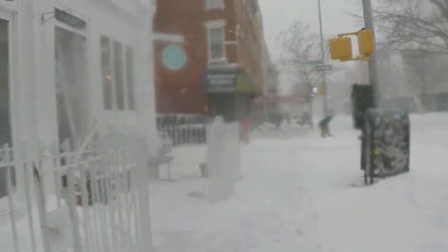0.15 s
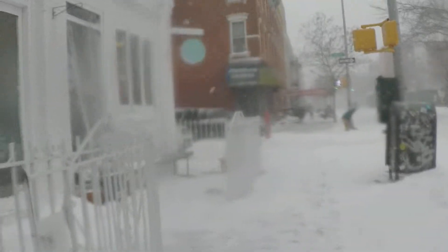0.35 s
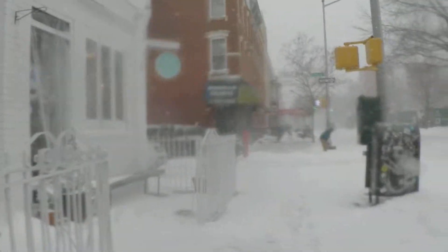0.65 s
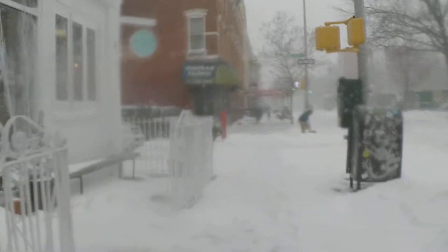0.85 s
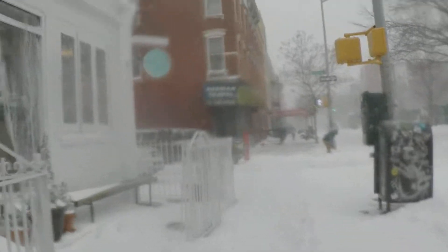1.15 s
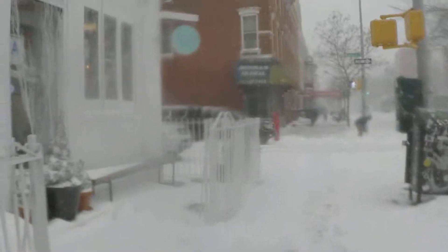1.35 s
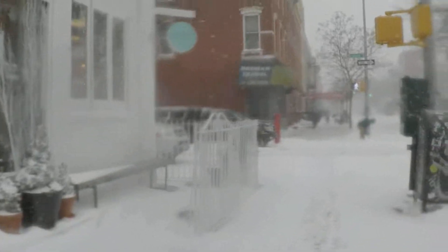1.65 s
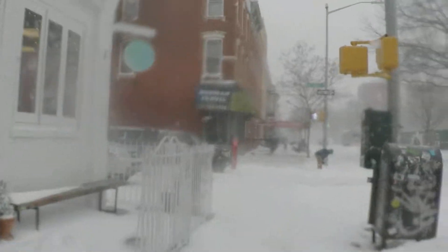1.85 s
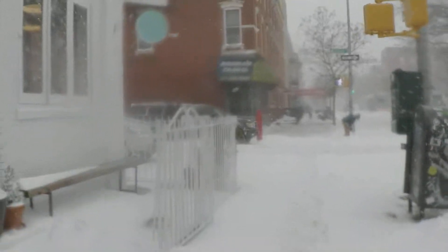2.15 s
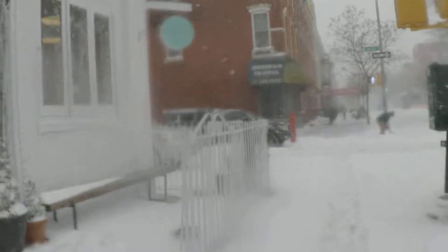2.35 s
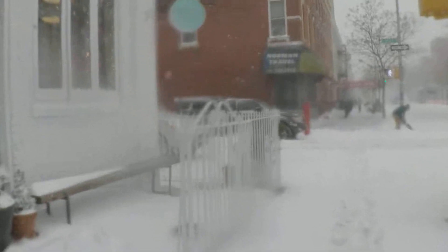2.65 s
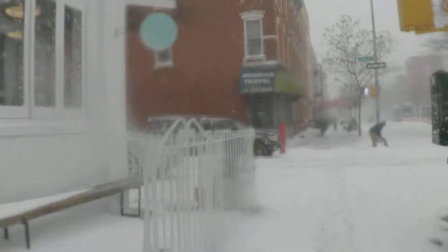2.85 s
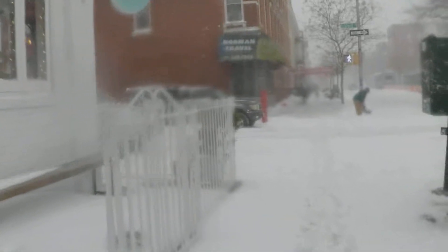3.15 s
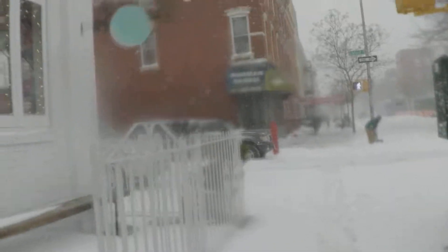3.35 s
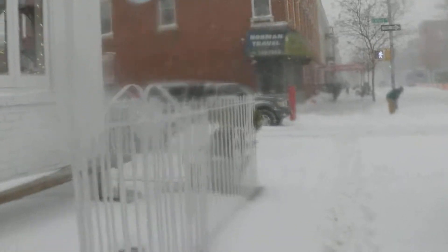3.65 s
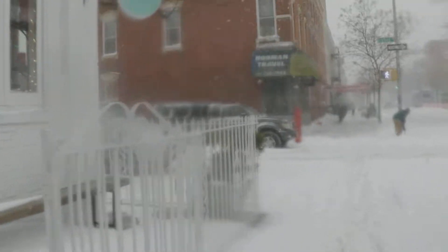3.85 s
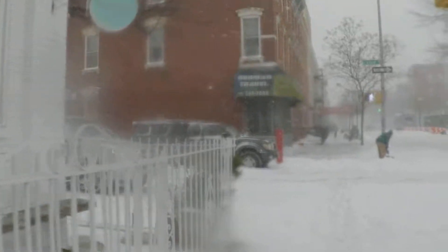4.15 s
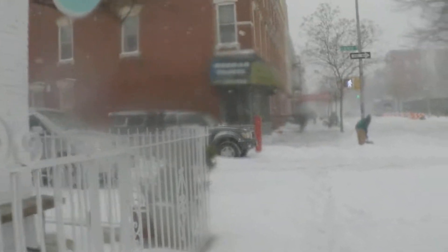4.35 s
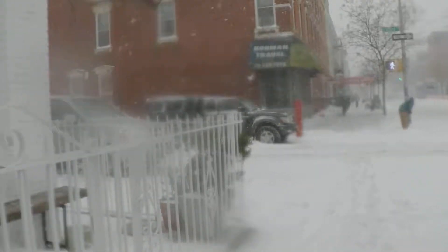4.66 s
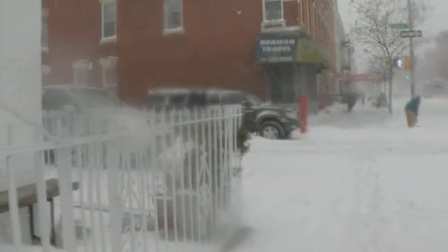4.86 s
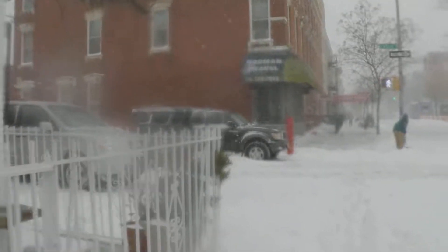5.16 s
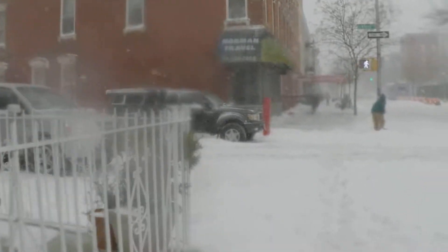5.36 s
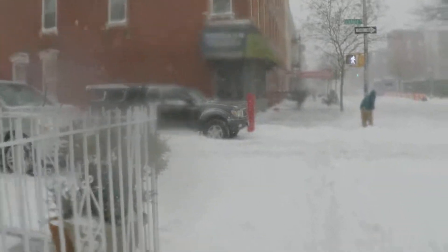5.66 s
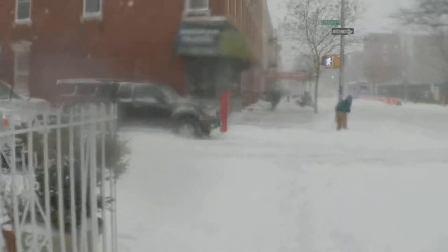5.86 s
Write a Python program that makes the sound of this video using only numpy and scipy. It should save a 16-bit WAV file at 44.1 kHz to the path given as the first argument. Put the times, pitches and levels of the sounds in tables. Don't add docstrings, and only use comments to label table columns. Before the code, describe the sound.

Outdoors in a snowstorm, strong wind strikes a small handheld stereo microphone. A deep, uneven rumble dominates the right, while the sheltered left gets duller thuds and fluttering bursts. Faint snow hiss and tiny ice ticks sit close on top. Boots crunch softly early on, then most clearly just before four seconds, where a hollow howl rises, and again near five.

```python
import sys
import numpy as np
from scipy import signal
from scipy.fft import rfft, irfft
from scipy.io import wavfile
from scipy.ndimage import uniform_filter1d

SR = 44100
rng = np.random.default_rng(int(sys.argv[2]) if len(sys.argv) > 2 else 0)


def voltage_ratio(level):
    return 10 ** (np.asarray(level, float) / 20)


def put_to_file(sound):
    columns = np.atleast_2d(sound).T
    safe = np.clip(columns, -1, 1)
    whole_steps = np.round(safe * 32767)
    wavfile.write(sys.argv[1], SR, whole_steps.astype(np.int16))


N = 264644
TIME = np.arange(N) / SR
FREQ = np.arange(N // 2 + 1) * SR / N + 1e-9

# time [s], gust force [dB], fineness of the eddies [dB].
WIND = [(0.0, -16, 2), (0.3, -12, -3), (0.75, -10.5, -0.5), (0.95, -14, -1.5), (1.15, -9.5, -3),
        (1.6, -14.5, 0), (1.95, -14, -4), (2.2, -12.5, -1.5), (2.75, -10, -0.5), (3.15, -13, -0.5),
        (3.55, -14, 5.5), (4.05, -12, 3.5), (4.3, -11, -2), (4.75, -14, 4), (5.05, -13, 5.5), (5.5, -11, 2),
        (5.9, -9.5, -3.5), (6.0, -13.5, 0)]
# frequency [Hz], density [dB per Hz].
WINDWARD_COLOUR = [(12, -22.5), (25, -0.5), (45, 0.5), (100, -7), (220, -16.5), (480, -16.5), (620, -19.5),
                   (800, -30), (1200, -43), (2200, -64.5), (4500, -74), (9000, -76)]
ROAR_HZ, RUSH_HZ = 100, 330
ROAR_DB, RUSH_DB = -7, -12.5
ROAR_FOLLOW, BUFFET_YIELD = 0.24, 0.067
# time [s], half length [s], boost [dB].
POUNDS = [(0.35, 0.037, 2), (0.49, 0.043, 1.5), (0.81, 0.066, 2), (1.67, 0.014, 6.5), (1.8, 0.076, 4),
          (2.09, .06, 0), (2.53, 0.039, 2.5), (2.93, 0.073, 2), (3.24, .04, 3.5), (3.76, 0.11, 2.5),
          (3.93, 0.04, -10), (4.3, 0.021, 4), (4.79, 0.033, -6.5), (5.07, .04, -7.5), (5.12, 0.065, 4),
          (5.51, .05, -5), (5.61, .05, -1), (5.93, 0.027, 3.5)]
# time [s], half length [s], boost [dB].
ROLLS = [(0.0, 0.055, 0), (0.09, 0.052, -2.5), (0.49, 0.01, 6.5), (1.31, 0.03, 8), (1.55, 0.1, 8),
         (1.86, 0.016, -5), (1.97, 0.014, -10), (2.72, 0.056, 3), (3.68, 0.022, 3), (3.93, 0.11, 7),
         (4.15, 0.022, 12.5), (5.4, 0.032, 3.5), (5.51, 0.058, -5), (5.68, 0.078, 4.5), (5.85, .05, 2),
         (1.8, 0.04, 2.5), (5.96, 0.062, 8)]
# time [s], half length [s], boost [dB].
SLAPS = [
    (1.304, 0.021, 8.5),
    (4.148, 0.03, -0.5),
    (4.812, 0.011, 9),
    (1.673, .025, 6.5),
    (3.784, .03, 4.5),
    (4.927, 0.023, 4),
]
# time [s], attack [s], hold [s], release [s], level [dB].
HOWLS = [
    (3.787, .1, 0.14, .05, -21),
    (3.905, .2, 0.034, 0.45, -17),
    (4.93, 0.055, .001, 0.031, -13.5),
]
# frequency [Hz], width [Hz], level [dB].
HOWL_MODE = [
    (460.5, 80, 0),
]
HOWL_DEPTH_DB = 15

# time [s], attack [s], hold [s], release [s], strength [dB].
EDDIES = [(0.68, .1, 0, .11, -22), (1.08, .04, 0, .09, -34), (1.3, .13, 0, .05, -33),
          (1.48, .14, 0, .09, -16.5), (1.53, .1, .035, .09, -16.5), (1.672, .07, .01, .13, -16),
          (2.38, .13, 0, .25, -17), (2.46, .1, .14, .1, -22), (2.71, .12, .12, .1, -22.5),
          (2.9, .2, 0, .2, -20), (3.1, .2, .03, .19, -32.5), (3.54, .2, 0, .2, -40),
          (4.05, .06, 0, .16, -31), (4.34, .2, 0, .3, -22), (4.25, .07, .2, .05, -29),
          (5.18, .11, 0, .12, -31), (5.39, .13, 0, .17, -17), (5.89, .3, 0, .12, -35)]
# frequency [Hz], density [dB per Hz].
LEE_COLOUR = [(15, -12), (45, -8), (130, 0), (250, -3), (450, -8), (700, -19), (1000, -30), (2000, -51),
              (5000, -75)]
FLUTTER_HZ, TEAR_HZ = 200, 500
CALM_DB, THUD_CALM_DB, THUD_SLOPE = -51, -36, .52
TEAR_CALM_DB, TEAR_TOP_DB, TEAR_SLOPE = -50, -23, 2.0

# frequency [Hz], share [1].
LEAK = [(40, .58), (100, .52), (220, .35), (300, .16), (370, 0), (470, -.2), (600, -.33), (800, -.52),
        (1100, -.5), (2000, -.1)]
LEAK_TURN = .27
LEE_NULL_SHIFT = 1.45

# time [s], density [dB].
DRIFT = [(0.0, -60.5), (0.42, -55), (0.65, -52.5), (0.85, -58), (1.49, -59.5), (1.82, -58.5), (2.31, -60.5),
         (2.47, -56), (3.26, -58.5), (3.64, -55.5), (3.93, -50.5), (4.08, -56), (4.44, -58.5), (4.66, -62),
         (4.83, -62), (5.23, -52.5), (5.6, -60.5), (6.0, -61.5)]
# time [s], half length [s], boost [dB].
FLURRIES = [(0.32, 0.038, 5.5), (0.64, 0.012, 7), (0.72, 0.044, 7), (1.18, 0.098, 7.5), (1.34, 0.029, -7),
            (1.81, 0.025, 5), (1.92, 0.012, 8), (2.04, 0.077, 4), (2.32, 0.051, 6), (2.65, 0.026, 2),
            (2.72, 0.063, -6), (2.82, 0.098, 5), (3.83, 0.06, -13), (3.95, .05, -2), (4.33, 0.054, 2),
            (4.79, 0.11, 5), (5.14, 0.052, 4.5), (5.53, 0.044, 7), (5.84, 0.046, 5.5)]
# frequency [Hz], density [dB per Hz].
SNOW_COLOUR = [(900, 3.5), (1300, 4), (2100, -1.5), (3700, -7.5), (5000, -12.5), (6000, -8), (7300, -3),
               (8300, -7), (9800, -8.5), (11300, -17), (12500, -22.5), (13300, -49), (14800, -64)]

# time [s], peak [dB], left minus right [dB], ring [Hz].
GRAINS = [(0.226, -34, -9, 8000), (0.2756, -31, -5, 7380), (0.6473, -35, -10, 6460), (0.6968, -33, 6, 7330),
          (0.7554, -21, -4, 6000), (0.901, -33, -6, 9070), (1.0623, -32.5, -9, 9000),
          (1.1818, -21, -1, 7560), (1.1912, -27, -11, 7650), (1.5783, -22, -1, 7360),
          (1.7977, -34, -20, 9320), (1.843, -36, -17, 7100), (1.9854, -25.5, -3.5, 6560),
          (2.012, -33, -7, 9160), (2.0423, -31, 3, 7800), (2.1944, -34, -4.5, 6600), (2.819, -41, 10, 7440),
          (2.8335, -25.5, -5, 6860), (3.235, -20.5, -15, 7070), (3.3468, -34, -17, 8940),
          (3.532, -22.5, -5, 8330), (3.8207, -28, -3, 7000), (3.9937, -30, -18, 7530),
          (4.045, -26, 0, 7360), (4.334, -34.5, -7, 7500), (4.595, -34, -2.5, 6730), (5.049, -28, -4, 7250),
          (5.188, -33, 12, 7140), (5.2794, -22, 3, 7400), (5.3587, -38, 4, 7600)]
GRAIN_T60_S = 0.007
GRAIN_FLOOR_HZ = 5800
# time [s], peak [dB], ring [Hz].
KNOCKS = [
    (0.3656, -32, 1430),
    (0.8722, -21.5, 1520),
    (1.6252, -33, 1410),
    (3.2365, -33, 1600),
]
HOUSING_TOP_HZ = 11900

# time [s], attack [s], hold [s], release [s], crunch [dB].
STEPS = [
    (1.221, .11, .001, 0.029, -44.5),
    (2.388, .07, 0.27, 0.068, -48.5),
    (2.728, .05, .001, 0.054, -47),
    (3.728, 0.049, 0.055, 0.045, -59),
    (3.82, 0.1, .001, 0.085, -40.5),
    (3.927, 0.19, 0.097, 0.21, -41.5),
    (4.702, .008, .001, 0.076, -44.5),
    (4.81, 0.069, .001, 0.13, -41.5),
    (4.9, .1, 0.21, .01, -52.5),
]
STEP_DEPTH_DB, BRIGHT_DB, BRIGHT_SLOPE = 23, -16.5, 1.93
# frequency [Hz], width [Hz], level [dB].
CRUST = [
    (1340, 370, -3.5),
    (1790, 224, -3),
]
# frequency [Hz], width [Hz], level [dB].
CRUST_BRIGHT = [
    (2870, 460, 9),
    (3900, 170, 4),
    (5500, 560, 6),
    (6800, 730, -4),
]
# time [s], peak [dB], bright part [dB], decay by 60 dB [s].
CRACKS = [(1.179, -43, -18, 0.045), (1.2035, -45, -19, 0.043), (2.5154, -32, -20, 0.081),
          (2.634, -30, -43, 0.091), (2.7347, -39, -22, 0.058), (3.692, -38, -28, 0.11),
          (3.78, -31, -6, 0.045), (3.8213, -26, 9, 0.036), (3.994, -54, -2, 0.03),
          (4.7007, -50, -18, 0.044), (4.7905, -34, -19, 0.032), (4.8083, -35, -18, 0.062)]


def unit(x):
    return x / np.sqrt(np.mean(x ** 2))


def curves(table):
    s, *columns = np.transpose(table)
    return [np.interp(TIME, s, c) for c in columns]


def bumps(table, power=2):
    return sum(db * np.exp(-((TIME - s) / half) ** power) for s, half, db in table)


def swell(s, attack, hold, release):
    corners = np.cumsum([s - attack, attack, hold + 1e-4, release])
    return np.interp(TIME, corners, [0, 1, 1, 0])


def swell_db(row, depth_db):
    up = swell(*row[:4])
    return np.where(up > 0, row[4] - depth_db * (1 - up), -120)


def shape(x, response):
    return irfft(rfft(x) * response, N)


def colour(points):
    hz, db = np.transpose(points)
    return voltage_ratio(np.interp(np.log(FREQ), np.log(hz), db))


def modes(table):
    return sum(voltage_ratio(db) / (1 + 1j * (FREQ - hz ** 2 / FREQ) / width) for hz, width, db in table)


def under(hz):
    return 1 / np.sqrt(1 + (FREQ / hz) ** 8)


def over(gain):
    return np.sqrt(1 - gain ** 2)


def turbulence(response, even, span_s):
    x = unit(shape(rng.standard_normal(N), response))
    span = int(span_s * SR)
    swing = uniform_filter1d(uniform_filter1d(x ** 2, span), span)
    evened = x / (swing + 0.019) ** (even / 2)
    trim = np.sqrt(response / (response + 0.0013 * response.max()))
    return unit(shape(evened, trim))


def windward():
    gust_db, fine_db = curves(WIND)
    slap_db = bumps(SLAPS, power=4)
    buffet_db = gust_db - BUFFET_YIELD * fine_db + bumps(POUNDS)
    roar_db = gust_db + ROAR_DB + ROAR_FOLLOW * fine_db + bumps(ROLLS) + 0.61 * slap_db
    rush_db = gust_db + RUSH_DB + fine_db + slap_db
    howl_db = np.max([swell_db(row, HOWL_DEPTH_DB) for row in HOWLS], axis=0)
    air, low, mid = colour(WINDWARD_COLOUR), under(ROAR_HZ), under(RUSH_HZ)
    buffet = turbulence(air * low, even=.55, span_s=.045)
    roar = turbulence(air * over(low) * mid, even=0.21, span_s=0.02)
    rush = turbulence(air * over(mid), even=0.034, span_s=0.036)
    howl = turbulence(np.abs(modes(HOWL_MODE)) ** 2, even=0.32, span_s=.02)
    return voltage_ratio(buffet_db) * buffet + voltage_ratio(roar_db) * roar + voltage_ratio(rush_db) * rush + voltage_ratio(howl_db) * howl


def lee():
    rises_db = [(row[4] - CALM_DB) * np.sin(np.pi / 2 * swell(*row[:4])) for row in EDDIES]
    over_db = np.max(rises_db, axis=0)
    thud_db = THUD_CALM_DB + THUD_SLOPE * over_db
    flutter_db = CALM_DB + over_db
    tear_db = np.maximum(TEAR_CALM_DB, TEAR_TOP_DB + TEAR_SLOPE * (over_db - over_db.max()))
    air, low, mid = colour(LEE_COLOUR), under(FLUTTER_HZ), under(TEAR_HZ)
    thud = turbulence(air * low, even=0.36, span_s=0.0023)
    flutter = turbulence(air * over(low) * mid, even=0.26, span_s=0.078)
    tear = turbulence(air * over(mid), even=0.26, span_s=.008)
    return voltage_ratio(thud_db) * thud + voltage_ratio(flutter_db) * flutter + voltage_ratio(tear_db) * tear


def patter(rate, spread_db, tail_s):
    hit = rng.random(N) < rate / SR
    size = voltage_ratio(spread_db * np.minimum(rng.exponential(size=N), 4))
    return unit(signal.lfilter([1], [1, -np.exp(-1 / (tail_s * SR))], hit * size))


def snow():
    drift_db, = curves(DRIFT)
    level_db = drift_db - drift_db.mean() + bumps(FLURRIES)
    shell = colour(SNOW_COLOUR)
    shared = patter(rate=250, spread_db=11.5, tail_s=0.00083)
    # from [Hz], to [Hz], share of patter, how much of the drift it follows.
    bands = [(500, 5900, 0.25, 0.47), (4560, 6070, 0.93, 0.83), (7800, 18000, 1.0, 0.88)]
    out = 0
    for lo_hz, hi_hz, grain, follow in bands:
        own = np.array([patter(rate=360, spread_db=13.5, tail_s=0.0016) for _ in range(2)])
        carrier = (1 + grain * (0.85 * shared + 0.5 * own)) * rng.standard_normal((2, N))
        part = shell * under(hi_hz) * over(under(lo_hz))
        out = out + voltage_ratio(follow * (level_db + 1.58)) * shape(carrier, part)
    return voltage_ratio(-46 + np.array([[-1.2], [1.2]])) * out


def ping(db, hz, t60, rasp, bend=1):
    t = np.arange(int(t60 * SR)) / SR
    chance = rng.standard_normal((2, 1400))
    turn = bend * np.array([[0], [np.pi + 1.5 * chance[0, -1]]])
    rough = 1 + rasp * uniform_filter1d(chance, size=5)[:, :len(t)]
    fade = np.exp(-np.log(1000) * t / t60) * np.minimum(t / 0.0008, 1)
    return voltage_ratio(db) * rough * np.sin(2 * np.pi * hz * t + turn) * fade


def ticks():
    out = np.zeros((2, N))
    for s, db, pan_db, hz in GRAINS:
        hit = ping(db + 2.0, hz, GRAIN_T60_S, rasp=1.2)
        hit = hit * voltage_ratio(np.array([[pan_db], [-pan_db]]) / 2)
        out[:, int(s * SR):int(s * SR) + hit.shape[1]] += hit
    out = shape(out, np.sqrt(1 - .9 * under(GRAIN_FLOOR_HZ) ** 2))
    for s, db, hz in KNOCKS:
        hit = ping(db + 3.5, hz, t60=0.004, rasp=0.6, bend=0)
        out[:, int(s * SR):int(s * SR) + hit.shape[1]] += hit
    return out


def crunches():
    grit = (.6 + patter(rate=300, spread_db=3.8, tail_s=.003)) * rng.standard_normal((3, N))
    sides = grit[0] + 1.06 * grit[1:]
    crust = unit(shape(sides, modes(CRUST)))
    bright = unit(shape(sides, modes(CRUST_BRIGHT) * under(8800)))
    dull, sharp = 0, 0
    for step in STEPS:
        crunch_db = swell_db(step, STEP_DEPTH_DB)
        bright_db = BRIGHT_DB + BRIGHT_SLOPE * (step[4] + 45)
        dull = dull + voltage_ratio(crunch_db)
        sharp = sharp + voltage_ratio(crunch_db + bright_db)
    return dull * crust + sharp * bright


def cracks():
    slab = rng.standard_normal(N) + 1.3 * rng.standard_normal((2, N))
    snap, splinter = 0, 0
    for s, db, bright_db, t60 in CRACKS:
        fade = (TIME > s) * np.exp(-np.log(1000) * np.abs(TIME - s) / t60)
        snap = snap + voltage_ratio(db - 6.0) * fade
        splinter = splinter + voltage_ratio(db + bright_db - 24.0) * fade
    body = unit(shape(slab, modes(CRUST + [(800, 130, 0)])))
    edge = unit(shape(slab, modes(CRUST_BRIGHT[:2])))
    return snap * body + splinter * edge


def boots():
    return (crunches() + cracks()) * voltage_ratio(np.array([[-1.2], [1.2]]))


def leakage(ports):
    wide = np.pad(ports[::-1], ((0, 0), (4096, 4096)), mode="reflect")
    size = wide.shape[1]
    hz, share = np.transpose(LEAK)
    freq = np.arange(size // 2 + 1) * SR / size + 1e-9
    shifted = freq * np.array([[1], [LEE_NULL_SHIFT]])
    turn = np.exp(1j * LEAK_TURN * np.array([[-1], [1]]))
    leak = np.interp(np.log(shifted), np.log(hz), share) * turn
    return irfft(rfft(wide) * leak, size)[:, 4096:-4096]


def scene():
    ports = np.array([lee(), windward()])
    housing = shape(ticks() + boots(), under(HOUSING_TOP_HZ) ** 2)
    return ports + leakage(ports) + snow() + housing


def low_pass(x):
    return signal.sosfilt(signal.butter(12, 15820, fs=SR, output="sos"), x)


def record(dry):
    rounded = np.tanh(0.63 * dry) / 0.75
    return low_pass(rounded)


dry = scene()
out = record(dry)
put_to_file(out)
```